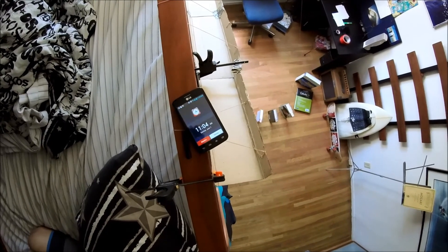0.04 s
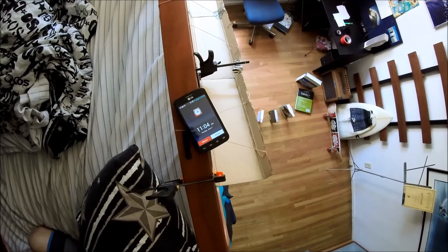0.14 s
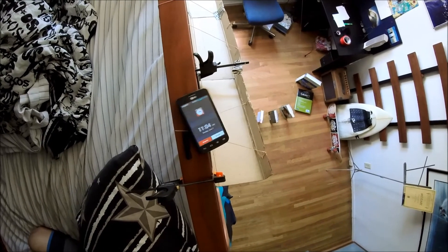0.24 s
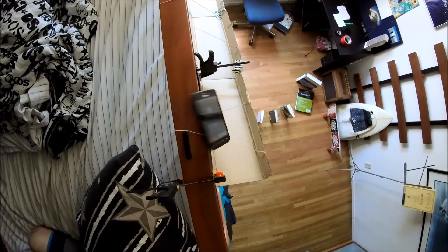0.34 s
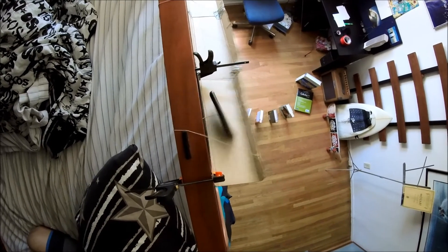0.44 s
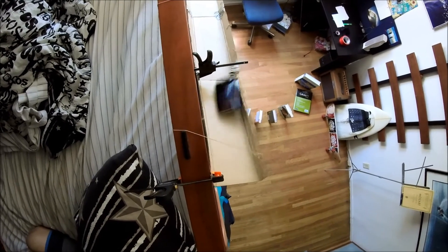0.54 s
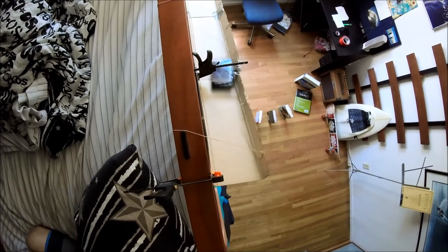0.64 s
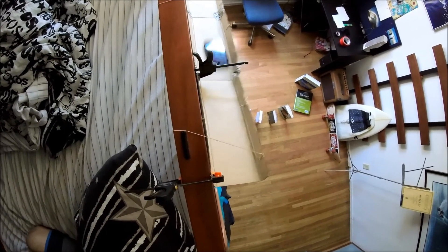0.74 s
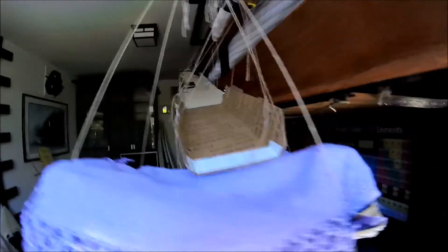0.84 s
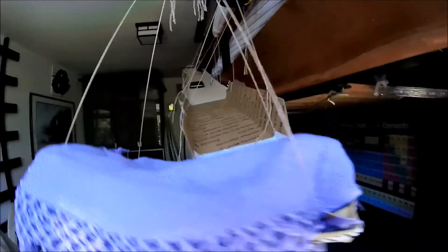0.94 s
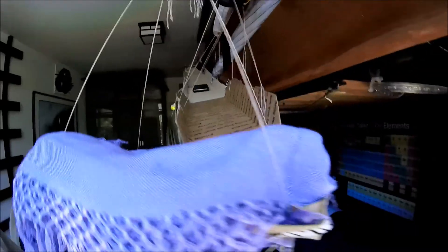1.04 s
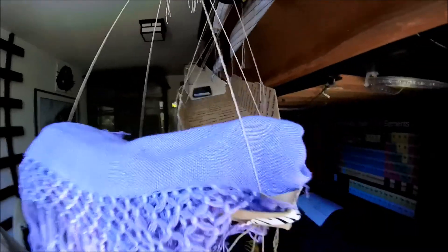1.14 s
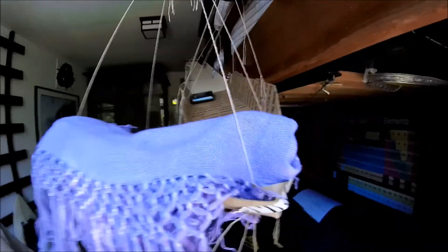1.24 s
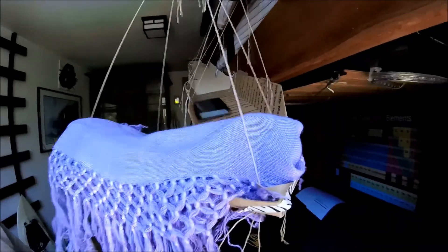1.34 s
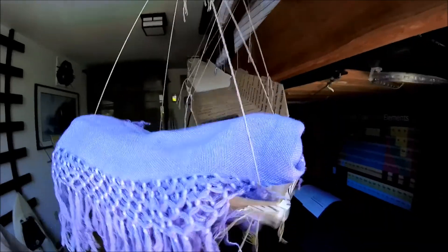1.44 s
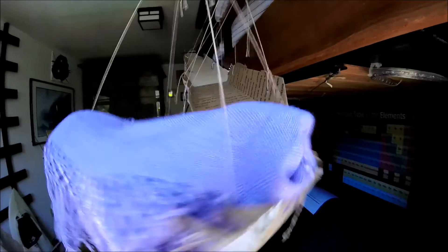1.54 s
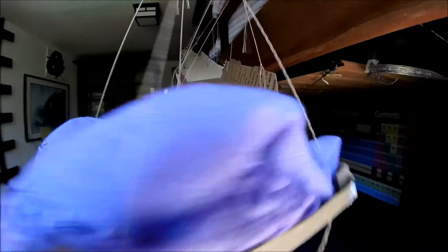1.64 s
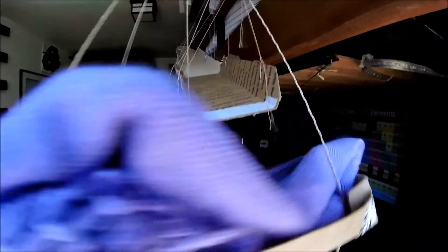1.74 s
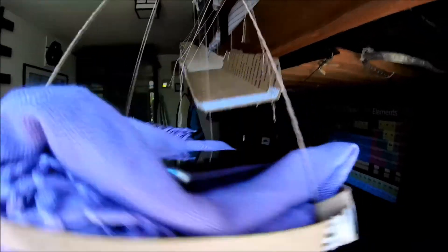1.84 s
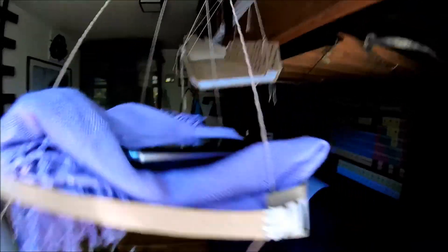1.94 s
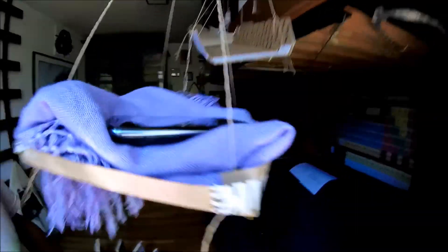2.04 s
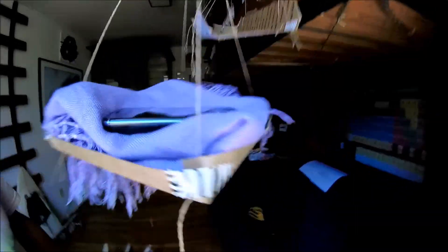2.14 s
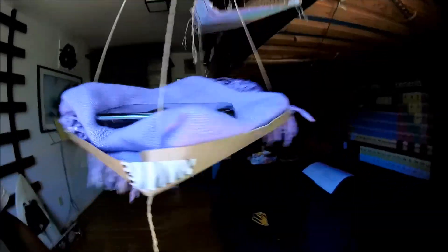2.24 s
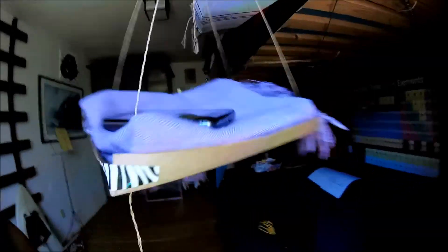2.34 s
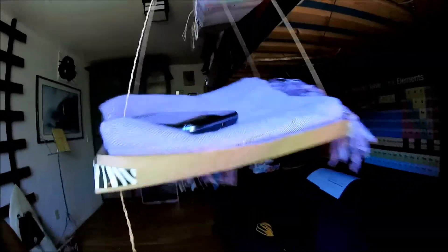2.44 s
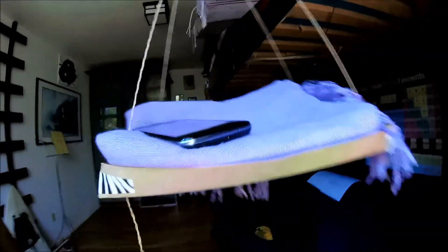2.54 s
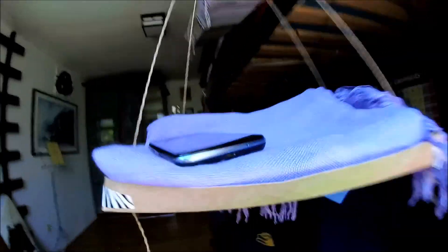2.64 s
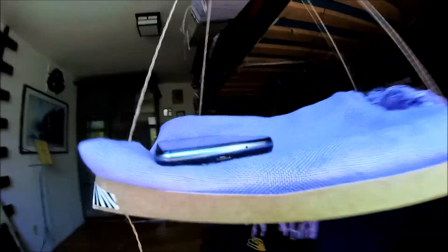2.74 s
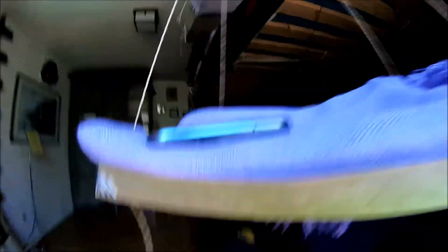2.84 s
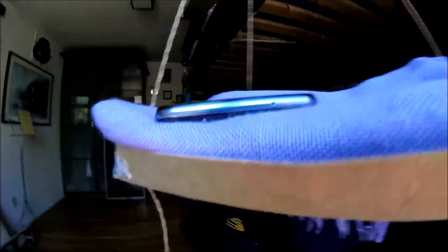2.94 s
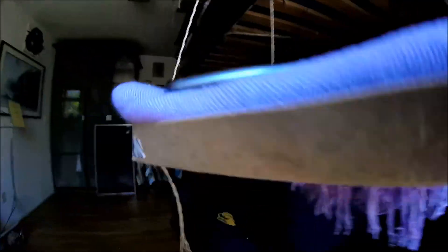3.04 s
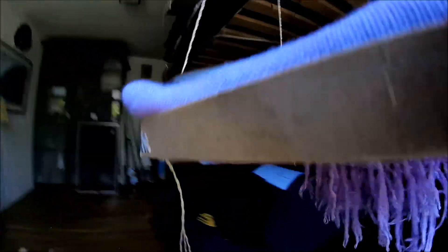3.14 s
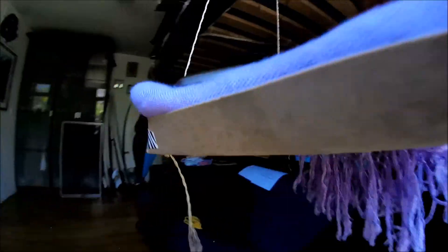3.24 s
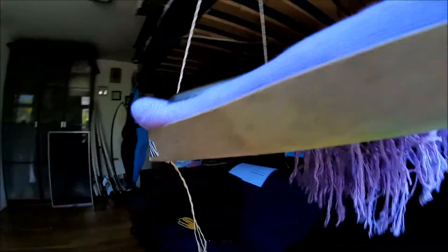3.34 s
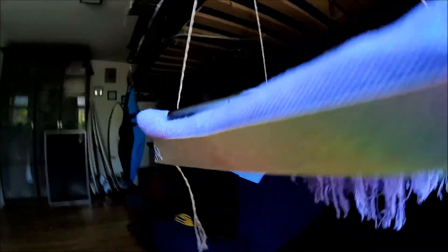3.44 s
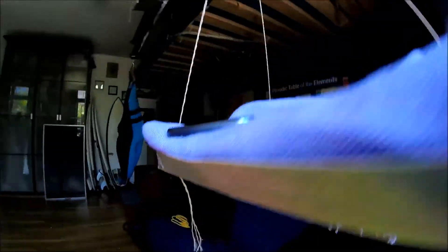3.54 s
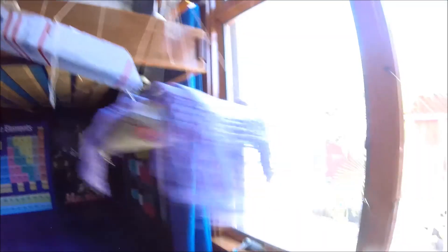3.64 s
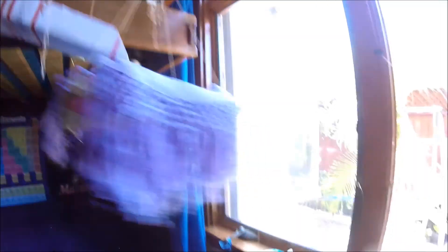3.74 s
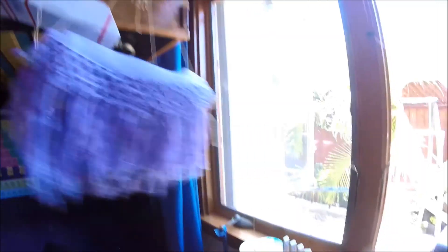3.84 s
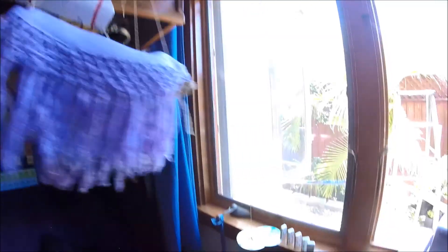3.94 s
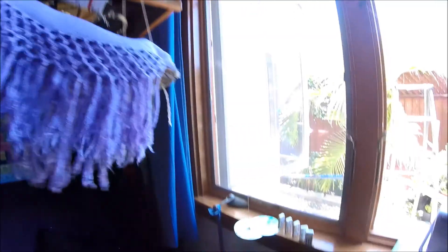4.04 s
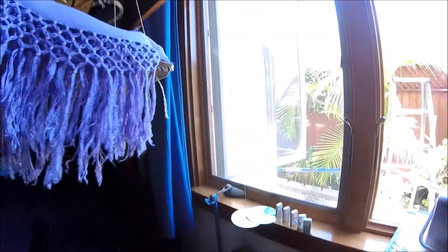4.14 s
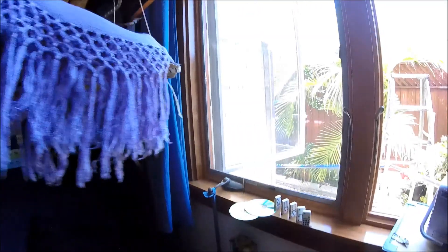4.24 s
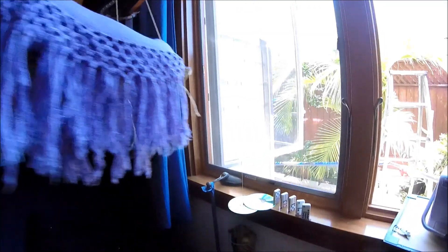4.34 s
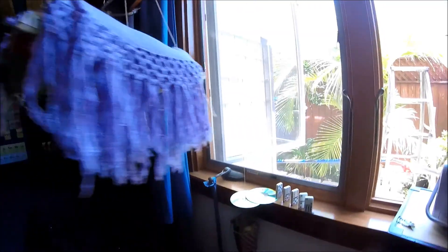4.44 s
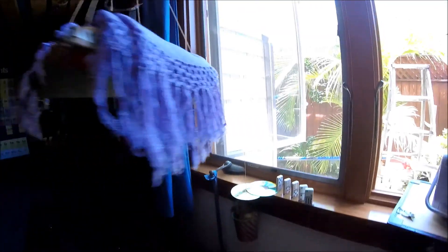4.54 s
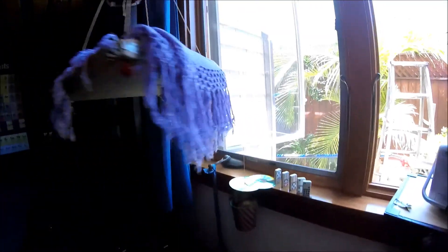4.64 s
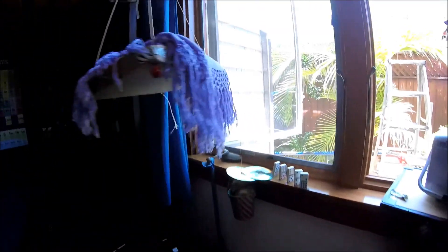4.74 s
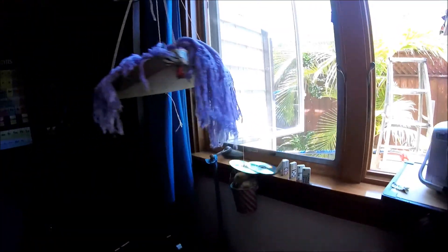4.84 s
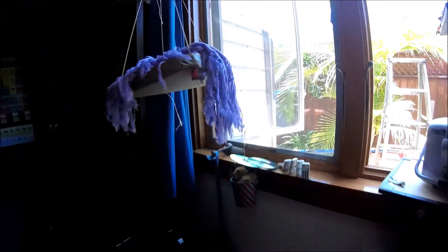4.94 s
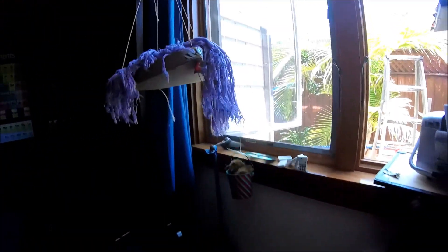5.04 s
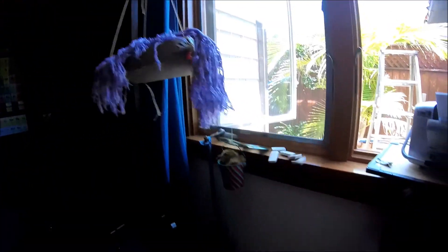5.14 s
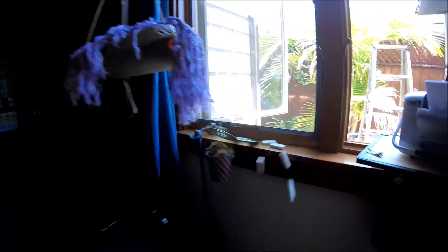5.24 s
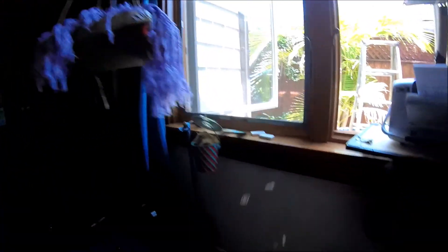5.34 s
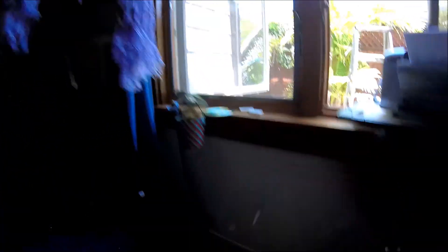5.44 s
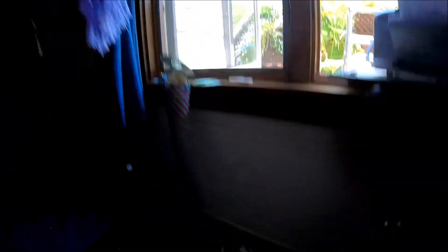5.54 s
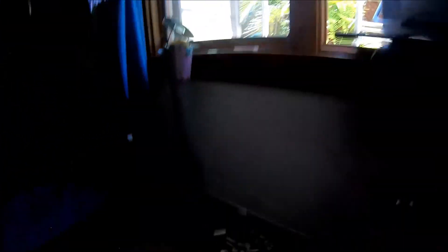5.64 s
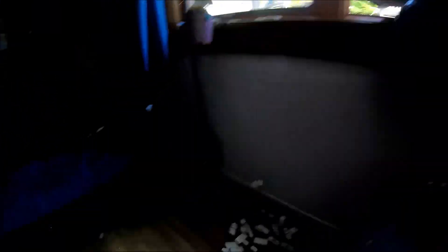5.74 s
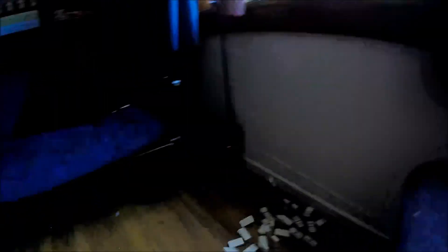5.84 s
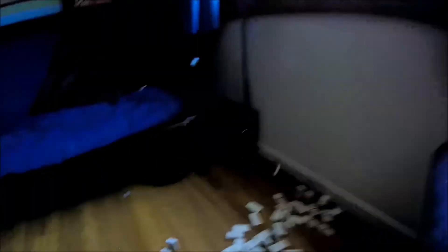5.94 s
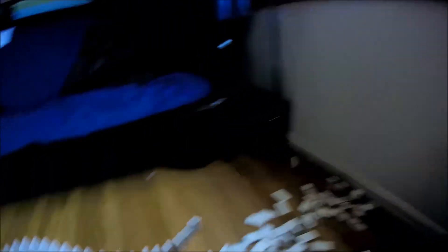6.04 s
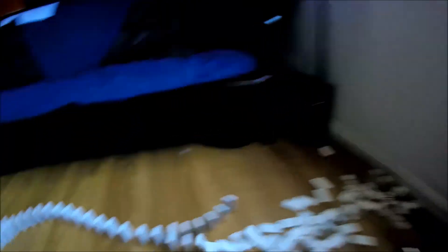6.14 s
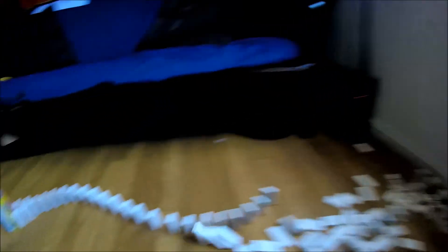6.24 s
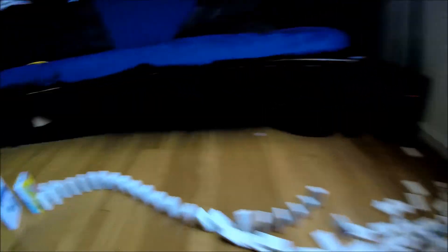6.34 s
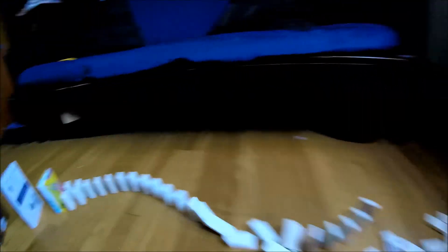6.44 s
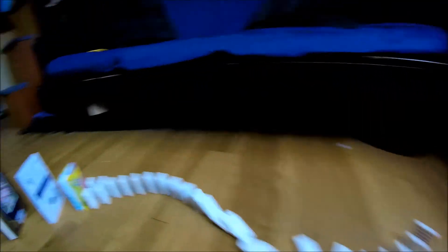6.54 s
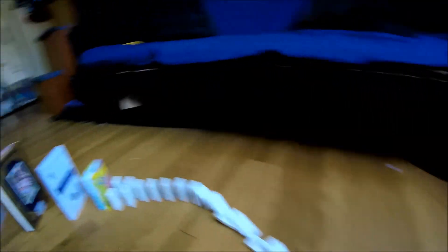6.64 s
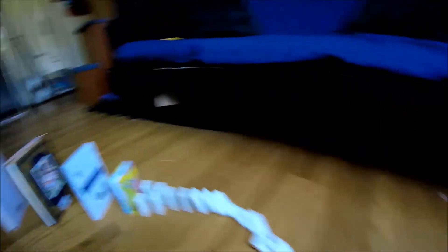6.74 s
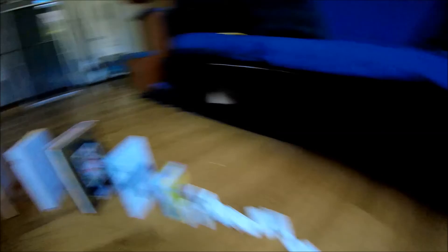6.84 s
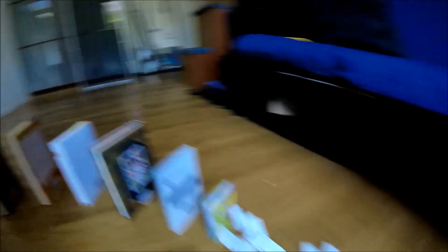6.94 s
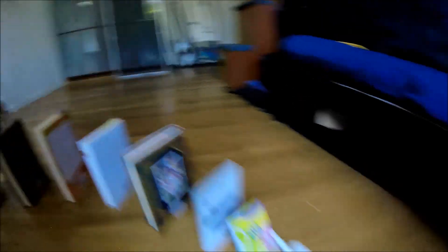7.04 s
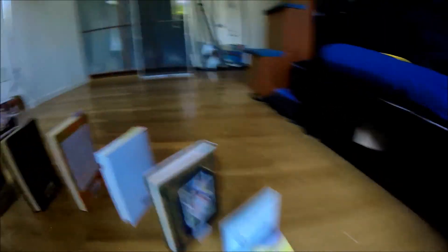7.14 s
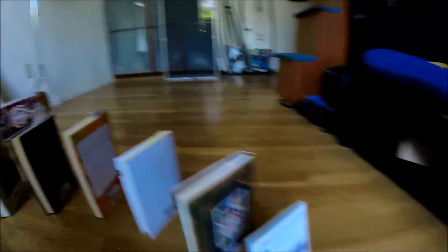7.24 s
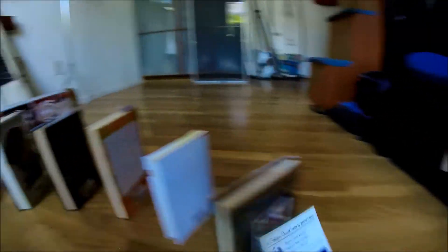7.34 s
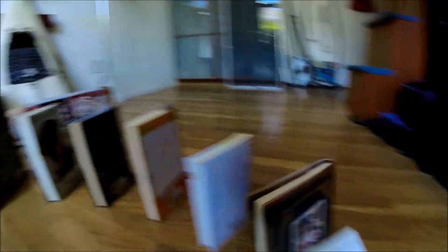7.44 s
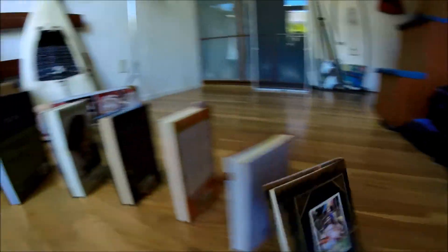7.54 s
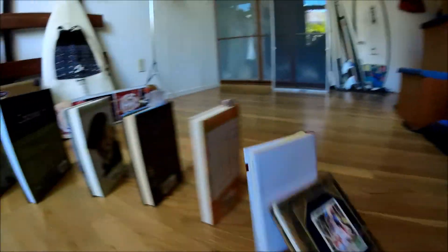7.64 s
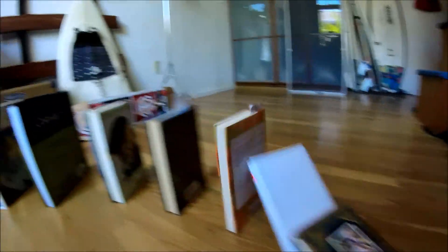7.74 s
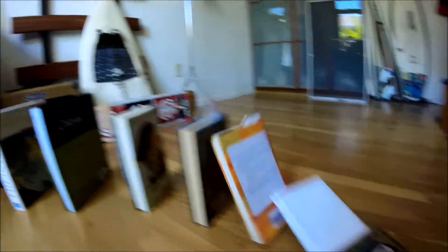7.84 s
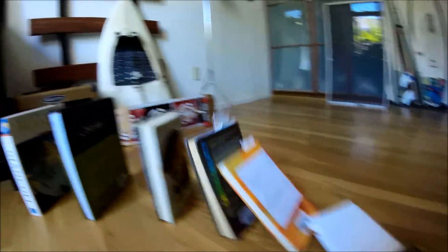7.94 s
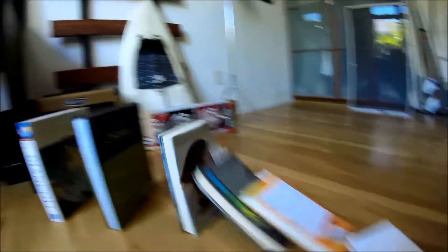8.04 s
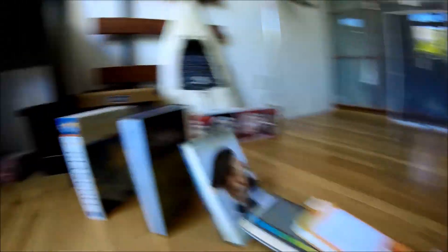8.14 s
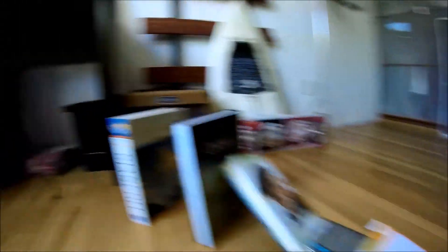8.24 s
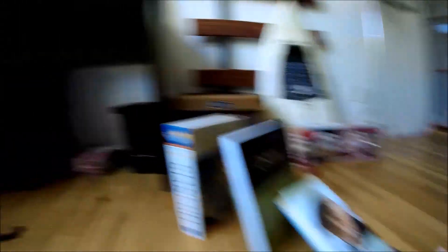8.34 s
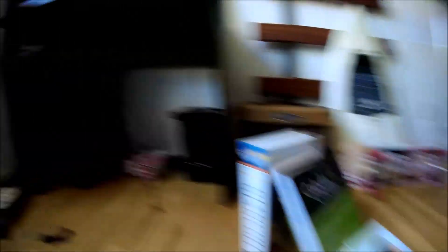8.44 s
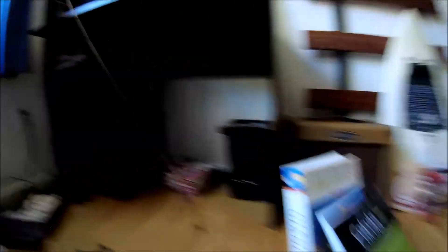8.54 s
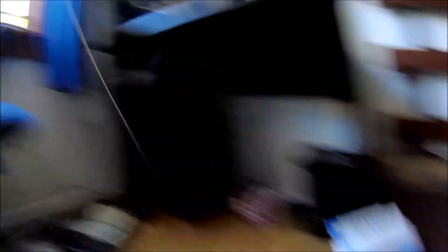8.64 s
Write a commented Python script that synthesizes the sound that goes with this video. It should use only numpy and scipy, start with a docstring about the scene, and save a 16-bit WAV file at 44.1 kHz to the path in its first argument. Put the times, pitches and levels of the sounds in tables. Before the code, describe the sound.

Short vibration hum, hollow cardboard knocks, a rustling cloth swing with sharp clicks, a bright spill of clacking dominoes, then padded book thuds indoors.

```python
"""A phone buzzes, tips off a beam and tumbles down a cardboard chute into a cloth swing that creaks and clicks.
Dominoes then drop from a window sill, spill over a wooden floor and topple in a row; the last fells some books.
The microphone travels along through the bedroom, so rumble and a short echo lie under it all.
Blows are short noisy pushes into resonances or filters, rubbing is a stream of random clicks,
and the motor and the ringing tiles are sums of sine waves."""
import sys
import numpy as np
from scipy import signal
from scipy.fft import rfft, irfft
from scipy.io import wavfile
from scipy.ndimage import uniform_filter1d

SR = 44100
rng = np.random.default_rng(int(sys.argv[2]) if len(sys.argv) > 2 else 0)


def unload_audio(sound):
    """Save the sound as a 16-bit wav file, at the path given as the first command line argument."""
    columns = np.transpose(np.atleast_2d(sound))
    # keep every value between -1 and 1, then stretch to whole-number steps
    steps = np.round(np.clip(columns, -1, 1) * 32767)
    wavfile.write(sys.argv[1], SR, steps.astype(np.int16))


N = 383669
TIME = np.arange(N) / SR
AGE = np.arange(SR // 5) / SR   # seconds since a blow
ATTACK = SR // 100   # samples in 10 ms


def from_db(db):
    """Turn decibels into an amplitude gain."""
    return 10 ** (np.asarray(db) / 20)


def rms_one(x):
    """Scale a sound to an average power of one."""
    return x / np.sqrt(np.mean(x ** 2) + 1e-20)


def even(x, span_s):
    """Level out slow changes in loudness but keep the quick grain."""
    power = uniform_filter1d(x ** 2, max(int(span_s * SR), 1))
    floor = np.mean(x ** 2) / 100
    return x / np.sqrt(np.maximum(power, 0) + floor)


def gains(rows):
    """Draw each dB column as a gain over time, silent outside the table's span."""
    times, *columns = np.transpose(rows)
    return [from_db(np.interp(TIME, times, column, left=-200, right=-200)) for column in columns]


def held(start, end, attack_s, release_db_per_s):
    """An envelope that rises in a straight line, holds until its end, then dies away."""
    rise = np.clip((TIME - start) / attack_s, 0, 1)
    drop_db = np.minimum(release_db_per_s * np.maximum(TIME - end, 0), 200)
    return rise * from_db(-drop_db)


def swell(s, rise, fall):
    """A bell-shaped envelope that peaks at s; rise and fall are its half lengths in seconds."""
    distance = (TIME - s) / np.where(TIME < s, rise, fall)
    return np.exp(-np.minimum(distance ** 2, 40))


def add(track, s, db, sound):
    """Lay a hit into a track; its level is the rms of its first 10 ms."""
    at = max(round(s * SR), 0)
    part = sound[:N - at] / np.sqrt(np.mean(sound[:ATTACK] ** 2) + 1e-20)
    track[at:at + len(part)] += from_db(db) * part


def colour(x, spectrum, stretch=1):
    """Filter with a drawn spectrum, its frequencies stretched, without any sound ahead of the blow."""
    size = 4096
    hz, db = np.transpose(spectrum)
    grid = np.log(np.maximum(np.arange(size // 2 + 1) * SR / size, 1) / stretch)
    # beyond the drawn points the response falls by up to 40 dB
    beyond = np.maximum(np.log(hz[0]) - grid, 0) + np.maximum(grid - np.log(hz[-1]), 0)
    level_db = np.interp(grid, np.log(hz), db) - 40 * np.minimum(beyond, 1)
    # folding the cepstrum makes the filter minimum-phase
    cepstrum = irfft(np.log(from_db(level_db)))
    cepstrum[1:size // 2] *= 2
    cepstrum[size // 2 + 1:] = 0
    response = irfft(np.exp(rfft(cepstrum)))
    return signal.oaconvolve(x, response)[:len(x)]


def resonate(x, modes, detune=0., scatter_db=0.):
    """Ring side-by-side resonances; each call finds them a little different in pitch and strength."""
    out = 0
    for k, (hz, width, db) in enumerate(modes):
        r = np.exp(-np.pi * width / SR)
        w = 2 * np.pi * hz * np.exp(detune * rng.normal()) / SR
        gain = (-1) ** k * from_db(db + scatter_db * rng.normal()) * (1 - r * r) / 2
        out = out + gain * signal.lfilter([1, 0, -1], [1, -2 * r * np.cos(w), r * r], x)
    return out


def contact(t60, diffuse):
    """A sharp push, then chatter that builds and dies, `diffuse` times as strong."""
    chatter = rng.standard_normal(len(AGE)) * from_db(-60 * AGE / t60)
    chatter = chatter * (1 - np.exp(-AGE / 0.00099))
    return (AGE == 0) + diffuse * chatter / np.linalg.norm(chatter)


def grains(per_s, spread_db):
    """Random clicks of uneven size."""
    sizes = from_db(spread_db * np.minimum(rng.exponential(1, N), 3.5))
    return (rng.random(N) < per_s / SR) * sizes * rng.choice([-1, 1], N)


def friction(spectrum, per_s, spread_db):
    """Rubbing: a stream of tiny slips into a surface."""
    return rms_one(colour(grains(per_s, spread_db), spectrum))


# tone of the room's steady air noise: (f/Hz, level/dB)
AIR_SPECTRUM = [(59, -35), (100, -6), (206, 1.5), (277, -5), (608, -8.5), (768, -14), (1100, -17.5),
                (1910, -13), (2470, -24), (3320, -22), (8640, -35.5), (14100, -41), (16000, -71)]


def room_air():
    """The quiet room hisses softly: steady random noise, shaped in tone."""
    return from_db(-53) * rms_one(colour(rng.standard_normal(N), AIR_SPECTRUM))


# tone of the low rumble: (f/Hz, level/dB)
RUMBLE_SPECTRUM = [(15, -11), (35, -2.5), (52, -4), (85, -6), (130, -10), (220, -27.5), (500, -57)]
# jolts of the travelling microphone: (t/s, rumble level/dB, half length/s)
MICROPHONE_JOLTS = [(1.0, -49, 0.14), (1.5, -47, 0.13), (2.1, -53.5, 0.69), (2.723, -45, .05),
                    (2.928, -50, 0.16), (3.286, -48, 0.057), (3.466, -44.5, 0.098), (7.4, -48.5, 0.21)]
STEADY_RUMBLE_DB = -58
# rumble set off by the blows, relative to their own level, and the decay time of its power
CHUTE_SHAKE_DB, BOOK_SHAKE_DB, SHAKE_DECAY_S = -18.5, -10, 0.055


def rumble(chute, row):
    """Rig and floor rumble: always a little, more after heavy blows and when the microphone is jolted."""
    keep = np.exp(-1 / (SHAKE_DECAY_S * SR))
    blows = from_db(CHUTE_SHAKE_DB) * chute + from_db(BOOK_SHAKE_DB) * row
    shaking = signal.lfilter([1 - keep], [1, -keep], blows ** 2 + 1e-18)
    power = from_db(STEADY_RUMBLE_DB) ** 2 + shaking
    for s, db, width in MICROPHONE_JOLTS:
        power += (from_db(db) * swell(s, width, width)) ** 2
    noise = colour(rng.standard_normal(N), RUMBLE_SPECTRUM)
    return np.sqrt(power) * even(noise, span_s=0.2)


# how long the bedroom echo takes to drop by 60 dB: (f/Hz, decay time/s)
ECHO_DECAY = [(100, 0.36), (500, 0.42), (1500, 0.26), (4000, 0.45), (9000, 0.36), (15000, 0.088)]


def room_echo():
    """Diffuse echo of unit energy: noise that dies at its own pace in each octave."""
    hz, t60 = np.transpose(ECHO_DECAY)
    age = np.arange(SR * 3 // 4) / SR
    out = 0
    for low in 60 * 2. ** np.arange(8):
        octave = signal.butter(2, [low, 2 * low], "band", fs=SR, output="sos")
        band = signal.sosfilt(octave, rng.standard_normal(len(age)))
        decay_s = np.interp(low * np.sqrt(2), hz, t60)
        out = out + band * from_db(-60 * age / decay_s)
    out = out * (1 - np.exp(-(age / 0.004) ** 2))   # the echo takes a moment to build
    return out / np.linalg.norm(out)


# the swing's cloth rustles as it sways: (t/s, level/dB before the trim below)
SWAY_RUSTLE = [(1.6, -57), (1.99, -56), (2.89, -53), (3.03, -43.5), (3.36, -61), (3.5, -64), (3.59, -59),
               (4.06, -59), (4.7, -73)]
RUSTLE_TRIM_DB = -2
# quick swishes of cloth and string: (t/s, level/dB, rise/s, fall/s, brightness with 1 = plain)
CLOTH_SWISHES = [(1.72, -51, 0.016, 0.05, .9), (1.845, -45, .007, 0.01, .75),
                 (2.675, -42.5, .021, 0.012, 1.7), (2.86, -45, 0.022, 0.025, 1.3),
                 (2.90, -35.5, 0.0088, 0.028, 1), (3.19, -42, 0.054, 0.065, 1.07),
                 (3.354, -42, .01, .028, 1.11), (3.445, -41.5, .006, .019, 0.93),
                 (3.531, -39.5, 0.026, 0.0065, 1.36), (3.905, -40.5, 0.013, .031, 0.61),
                 (4.3, -53, 0.13, 0.13, 0.81), (4.78, -45, .025, 0.13, 0.97),
                 (5.45, -48.5, .027, 0.052, .9)]
# tone of the rubbing fibres: (f/Hz, level/dB)
CLOTH_SPECTRUM = [(300, -5), (560, -3.5), (950, -5.5), (1500, -6), (2100, 3), (2650, -6), (3400, 0),
                  (4300, -6), (5500, -9), (7500, -12), (10000, -26), (15000, -30)]
# resonances of taut string and weave, which each swish excites differently: (f/Hz, width/Hz, level/dB)
WEAVE_MODES = [(1700, 210, 0), (3460, 130, 10.5), (4290, 140, 4), (7000, 490, -7.5)]


def cloth():
    """Fibres slip softly as the swing sways, and in swishes when it jerks."""
    rustle = gains(SWAY_RUSTLE)[0] * friction(CLOTH_SPECTRUM, per_s=3200, spread_db=3.5)
    out = from_db(RUSTLE_TRIM_DB) * rustle
    for s, db, rise, fall, bright in CLOTH_SWISHES:
        fibres = rms_one(colour(grains(per_s=3000, spread_db=3), CLOTH_SPECTRUM, stretch=bright))
        plucks = grains(per_s=2500, spread_db=3.5)
        weave = rms_one(resonate(plucks, WEAVE_MODES, detune=0.083, scatter_db=5))
        out += from_db(db) * swell(s, rise, fall) * rms_one(fibres + 0.54 * weave)
    return out


# resonances of the track under a rolling thing: (f/Hz, width/Hz, level/dB)
TRACK_MODES = [(499, 35, 9.5), (572, 23, 4)]
ROLL_START_S, ROLL_ATTACK_S, ROLL_RELEASE_DB_PER_S, ROLL_DB = 4.76, .05, 104, -40.5


def rolling():
    """Something small rolls before the dominoes fall: fine clicks make its track drone."""
    envelope = held(ROLL_START_S, ROLL_START_S + ROLL_ATTACK_S, ROLL_ATTACK_S, ROLL_RELEASE_DB_PER_S)
    drone = rms_one(resonate(grains(per_s=1400, spread_db=3.5), TRACK_MODES))
    return from_db(ROLL_DB) * envelope * drone


# hollow knocks of a light part: (t/s, peak level/dB, f/Hz, swell/s)
HOLLOW_KNOCKS = [(2.9493, -19.5, 544, 0.005), (3.35, -44.5, 585, 0.013)]


def hollow():
    """A cavity swells into one soft note and dies."""
    out = np.zeros(N)
    for s, db, hz, swell_s in HOLLOW_KNOCKS:
        age = np.maximum(TIME - s, 0)
        envelope = (age / swell_s * np.exp(1 - age / swell_s)) ** 2
        out += from_db(db) * envelope * np.sin(2 * np.pi * hz * age)
    return out


# small dry clicks close by: (t/s, level/dB before the final filter, centre f/Hz)
DRY_CLICKS = [(0.755, -35, 5500), (1.502, -38, 3640), (1.512, -40, 3760), (1.536, -34, 3200),
              (1.712, -42.5, 2930), (2.9185, -18.5, 3840), (2.9186, -18, 7640), (2.98, -42.5, 1180),
              (3.1562, -25.5, 5370), (3.162, -27.5, 1450), (3.2656, -36.5, 2170), (3.2901, -41, 2560),
              (3.397, -35.5, 1860), (3.4387, -42, 2620), (3.471, -30, 1800), (3.4758, -26, 2380),
              (3.577, -45, 3600), (7.5123, -45.5, 1155), (7.634, -36.5, 4100), (7.924, -38.5, 1700),
              (8.4948, -32, 3240)]


def ticks():
    """Hard little clicks: very short contacts ring three broad resonances set by each click's pitch."""
    out = np.zeros(N)
    for s, db, hz in DRY_CLICKS:
        body = [(0.89 * hz, 0.39 * hz, 0), (2.03 * hz, 0.31 * hz, -4), (2 * hz, 0.31 * hz, -5)]
        add(out, s, db, resonate(contact(t60=0.0094, diffuse=1.0), body, detune=.01))
    tone = [(100, 21), (1000, 0.5), (3000, -2), (4300, -3),
            (8000, -4), (10500, -12.5), (12500, -9), (15500, -17)]
    return colour(out, tone)


# tone of a hard crack of the phone's case: (f/Hz, level/dB)
CRACK_SPECTRUM = [(700, -34), (1200, -1.5), (1600, 6), (2050, 6.5), (2600, -20.5), (3500, -8.5),
                  (5000, -22.5), (8000, -22), (14000, -55)]
MOTOR_HZ = 221   # turns per second
# the parts of the hum: (multiple of the motor speed, level/dB within the hum)
HUM_PARTS = [(1, -6.5), (2, -13), (3, -18)]
# the vibration motor runs: (start t/s, end t/s, hum level/dB)
MOTOR_RUNS = [(0, .26, -52.5), (.43, .48, -50.5)]
MOTOR_SPIN_UP_S, MOTOR_RUN_DOWN_DB_PER_S = 0.027, 260
RATTLE_S, RATTLE_WIDTH_S, RATTLE_DB = .2, .05, -57.5   # the case chatters on the beam for a moment


def motor():
    """The off-centre weight hums; once a turn the case taps the beam."""
    hum = 0
    for start, end, db in MOTOR_RUNS:
        hum = hum + from_db(db) * held(start, end, MOTOR_SPIN_UP_S, MOTOR_RUN_DOWN_DB_PER_S)
    turns = MOTOR_HZ * TIME
    tone = sum(from_db(db) * np.sin(2 * np.pi * multiple * turns) for multiple, db in HUM_PARTS)
    taps = np.diff(np.floor(turns), prepend=0) * (1 + 0.15 * rng.standard_normal(N))
    rattle = from_db(RATTLE_DB) * swell(RATTLE_S, RATTLE_WIDTH_S, RATTLE_WIDTH_S)
    return hum * rms_one(tone) + rattle * rms_one(colour(taps, CRACK_SPECTRUM))


# the phone bounces in the cardboard chute: (t/s, boom level/dB, knock level/dB, crack level/dB)
PHONE_BOUNCES = [(0.489, -19, -12.5, -22), (0.5269, -14.5, -13.5, -27), (0.5549, -45, -30, -31),
                 (0.5715, -16, -19, -31.5), (0.6457, -16, -18, -41), (0.6921, -24.5, -24.5, -34.5),
                 (0.721, -23, -23.5, -22.5), (0.7544, -34.5, -31, -33), (0.886, -33, -40, -46),
                 (0.972, -35, -44, -54), (1.2007, -39, -40, -40), (1.347, -39, -48, -40.5),
                 (1.393, -34.5, -32, -57), (1.4454, -41, -36.5, -54), (1.5009, -37, -35, -27.5),
                 (1.512, -45, -45, -32.5), (1.5401, -38, -44, -34), (1.877, -41.5, -51, -44.5)]
# the phone slides between bounces: (start t/s, end t/s, drumming level/dB, scrape level/dB)
PHONE_SLIDES = [(0.494, 0.772, -35.5, -49), (.82, 1.043, -45.5, -50.5), (1.196, 1.528, -37.5, -47.5)]
# deep resonances of the chute: (f/Hz, width/Hz, level/dB)
BOOM_MODES = [(55, 35, -11), (150, 14.6, -7), (238.6, 21.5, 1.5), (336, 39, -6)]
# higher resonances of the chute: (f/Hz, width/Hz, level/dB)
KNOCK_MODES = [(440, 87, -3.5), (554, 71, 0), (735, 46, -11.5), (977, 85, -19.5)]
# tone of the chute drumming under the slide: (f/Hz, level/dB)
DRUMMING_SPECTRUM = [(65, -55), (110, -10.5), (224, 0), (332, -22), (380, -3), (467, -6.5), (540, -14),
                     (699, -7), (860, -14.5), (1300, -21.5), (1690, -31), (2860, -120)]
# tone of the scrape on its surface: (f/Hz, level/dB)
SCRAPE_SPECTRUM = [(590, -37), (1000, -17), (1340, 5), (1540, -7), (1910, 3.5), (2710, -10), (4410, -11),
                   (5660, -15), (8230, -18), (15000, -40)]
CRACK_SCATTER = 0.082   # the pitch of the crack differs by about this share from bounce to bounce
SLIDE_ATTACK_S, SLIDE_RELEASE_DB_PER_S = .01, 260


def phone():
    """The phone bounces in the chute, which booms and knocks, and slides between bounces."""
    out = np.zeros(N)
    for s, boom_db, knock_db, crack_db in PHONE_BOUNCES:
        push = contact(t60=0.076, diffuse=0.44)
        add(out, s, boom_db, resonate(push, BOOM_MODES, detune=0.038, scatter_db=3.5))
        add(out, s, knock_db, resonate(push, KNOCK_MODES, detune=0.04))
        stretch = np.exp(CRACK_SCATTER * rng.normal())
        add(out, s, crack_db, colour(contact(t60=0.03, diffuse=0.54), CRACK_SPECTRUM, stretch))
    drumming = friction(DRUMMING_SPECTRUM, per_s=540, spread_db=1.5)
    scrape = friction(SCRAPE_SPECTRUM, per_s=1000, spread_db=3.0)
    for start, end, drumming_db, scrape_db in PHONE_SLIDES:
        slide = from_db(drumming_db) * drumming + from_db(scrape_db) * scrape
        out += held(start, end, SLIDE_ATTACK_S, SLIDE_RELEASE_DB_PER_S) * slide
    return out


# books falling on each other: (t/s, thud level/dB, f/Hz, cover slap level/dB)
BOOK_FALLS = [(7.648, -24.5, 400, -39), (7.6933, -24, 407, -29.5), (7.7156, -32, 375, -28),
              (7.7888, -28, 440, -32), (7.842, -33, 360, -43), (7.8696, -23.5, 370, -37.5),
              (7.924, -23.5, 306, -33.5), (7.986, -26.5, 310, -34), (8.0088, -33, 610, -36),
              (8.074, -27.5, 150, -36), (8.133, -25.5, 286, -41), (8.171, -29, 290, -58),
              (8.211, -31, 293, -46), (8.2507, -16, 247, -33.5), (8.2812, -20, 290, -34.5),
              (8.372, -24.5, 227, -31), (8.4949, -25.5, 211, -30), (8.5142, -27, 218, -29.5),
              (8.5482, -29, 226, -43), (8.64, -37, 470, -33.5)]
# tone of the slapping covers: (f/Hz, level/dB)
SLAP_SPECTRUM = [(350, -11.5), (650, 7.5), (950, -3), (1400, 2.5), (2050, 7), (2700, -11), (3700, -10),
                 (5500, -18.5), (8500, -17), (14000, -63)]
# between blows the books lean and slide: (t/s, body level/dB, cover rub level/dB), before the trims below
BOOK_LEAN = [(7.55, -49, -53.5), (7.7, -50, -47), (7.836, -37, -52), (8.166, -35, -45), (8.326, -40, -46),
             (8.432, -45.5, -59), (8.582, -33, -44.5), (8.7, -35.5, -44.5)]
LEAN_BODY_TRIM_DB, LEAN_RUB_TRIM_DB = -4, -0.5
# tone of the books' bodies as they lean: (f/Hz, level/dB)
BODY_SPECTRUM = [(59, -49), (100, 3.5), (145, -1), (220, -3.5), (292, -8.5), (586, -6.5), (888, -37),
                 (1200, -33), (1560, -54), (2640, -120)]
# tone of cover rubbing on cover: (f/Hz, level/dB)
RUB_SPECTRUM = [(600, -2), (1000, -2), (2000, 3), (2700, -5.5), (3700, -5), (5500, -10), (8500, -11),
                (11000, -18), (15000, -24)]


def books():
    """Each book meets the next with a padded thud and a slap of covers, then slides on it."""
    out = np.zeros(N)
    for s, thud_db, hz, slap_db in BOOK_FALLS:
        modes = [(0.59 * hz, 55, -14), (hz, 60, 0), (1.55 * hz, 120, -9)]
        thud = resonate(contact(t60=0.053, diffuse=0.83), modes, detune=0.014, scatter_db=2.5)
        add(out, s, thud_db, colour(thud, [(40, -1.5), (600, 0.0), (1200, -14), (4000, -33)]))
        add(out, s, slap_db, colour(contact(t60=0.035, diffuse=2.5), SLAP_SPECTRUM))
    body, rub = gains(BOOK_LEAN)
    out += from_db(LEAN_BODY_TRIM_DB) * body * friction(BODY_SPECTRUM, per_s=370, spread_db=3.0)
    out += from_db(LEAN_RUB_TRIM_DB) * rub * friction(RUB_SPECTRUM, per_s=2300, spread_db=3)
    return out


# domino modes: (multiple of its pitch, level/dB, time to drop by 60 dB/s)
TILE_MODES = [(.79, -13, 0.027), (0.998, 6, 0.037), (1.025, -9, .022), (1.124, -5.5, 0.027)]
TILE_HZ, TILE_SCATTER_HZ = 8440, 99   # a domino's ring, and how much the tiles differ


def tile_ring():
    """One domino rings briefly, at a pitch of its own, with a hard snap at the start."""
    hz = TILE_HZ + TILE_SCATTER_HZ * rng.normal()
    ring = 0
    for ratio, db, t60 in TILE_MODES:
        decay = from_db(db - 60 * AGE / t60 + 4.9 * rng.normal())
        mode_hz = hz * ratio * (1 + 0.0064 * rng.normal())
        ring = ring + decay * np.sin(2 * np.pi * mode_hz * AGE)
    snap_tone = [(4000, -51), (7000, 20.5), (10000, 19.0), (11500, 7), (15000, -5.5)]
    return ring + 1.13 * colour(contact(t60=0.006, diffuse=0.88), snap_tone)


# many dominoes at once - off the sill, first landing, scattering over the floor, along the row:
# (start t/s, end t/s, attack/s, release/dB per s, clatter level/dB, ringing level/dB), before the final filters
DOMINO_SPILLS = [(5.025, 5.269, 0.021, 382, -29.5, -39), (5.555, 5.66, 0.016, 218, -33, -39),
                 (5.684, 6.102, .14, 70, -26, -33), (6.177, 7.22, 0.093, 95, -28.5, -32.5)]


def tumble(sound, spread_db, count):
    """Contacts of uneven strength at random moments of the spills, no two alike."""
    out = np.zeros(N)
    first, last = DOMINO_SPILLS[0][0], DOMINO_SPILLS[-1][1] + 0.18
    for when, size in rng.random((count, 2)):
        add(out, first + when * (last - first), spread_db * size ** 2, sound())
    return out


# the loudest falls of single dominoes, before the final filters:
# (t/s, wood body level/dB, edge level/dB, ring level/dB)
DOMINO_FALLS = [(4.9232, -37.5, -40.5, -34), (4.9989, -31.5, -33, -27.5), (5.0277, -24, -22.5, -35),
                (5.0996, -15, -26, -27.5), (5.1048, -19, -15.5, -32), (5.1756, -19.5, -23.5, -46),
                (5.2271, -24.5, -24.5, -39), (5.5037, -30, -33.5, -40), (5.549, -11.5, -15, -28),
                (5.6115, -18.5, -27, -19.5), (5.6166, -21, -16.5, -18.5), (5.638, -17, -25, -24.5),
                (5.7488, -25.5, -24.5, -40), (5.8492, -21.5, -25, -29), (5.8893, -25.5, -20.5, -27),
                (5.9267, -20.5, -45, -43), (5.9733, -25, -26, -28.5), (6.0905, -20, -30, -32),
                (6.127, -29, -25.5, -25), (6.1725, -23, -21, -38), (6.348, -34, -38, -19),
                (6.3713, -21, -29, -25.5), (6.4733, -23.5, -26.5, -26), (6.5181, -26, -24, -25),
                (6.5324, -22.5, -20, -25), (6.579, -23.5, -25, -20.5), (6.6376, -23.5, -25, -28),
                (6.732, -23, -28, -23), (6.768, -22.5, -33, -24.5), (6.834, -25, -31, -19),
                (6.8742, -35, -49, -16.5), (6.8789, -28, -22.5, -27), (6.933, -26.5, -36, -25),
                (6.9944, -32, -44, -20), (7.0658, -23, -24.5, -44), (7.1135, -28, -21.5, -27),
                (7.13, -19, -18.5, -32), (7.216, -25, -25.5, -32), (7.306, -20.5, -23.5, -34),
                (7.3504, -23.5, -55, -46)]
# lower resonances of the struck wood: (f/Hz, width/Hz, level/dB)
WOOD_BODY_MODES = [(237, 133, -6), (394, 132, -6), (570, 190, -6), (1344, 254, -9), (1938, 304, 1.5),
                   (2225, 310, -3)]
# higher, sharper-sounding resonances of the wood: (f/Hz, width/Hz, level/dB)
WOOD_EDGE_MODES = [(2835, 380, 2.5), (3470, 920, 1), (4240, 460, 0.5), (5810, 1010, -5), (6750, 750, -6)]
# tone of the many clacks on wood: (f/Hz, level/dB)
CLATTER_SPECTRUM = [(41, -34), (70, -6), (94, -10.5), (150, -3), (442, -6.5), (488, -10), (528, -11.5),
                    (594, -2.5), (896, -14.5), (1890, 2.5), (2480, -8), (3330, -5), (4940, -14),
                    (6630, -15.5), (7600, -20.5), (9880, -22), (16700, -120)]
# a small tile's hard contact has little bass, and its finite length dulls the very top: (f/Hz, level/dB)
TOUCH_SPECTRUM = [(170, -23), (360, 0.5), (600, -1), (900, 1), (1500, 0), (9600, -0.5), (11000, 0.5),
                  (13000, -3), (15500, -16)]
# resonances of the floor: (f/Hz, width/Hz, level/dB)
FLOOR_MODES = [(90, 34, 1.7), (150, 78, 0), (259, 39, 0.79)]
# the microphone comes down to the floor, and the boards drum louder: (t/s, gain level/dB)
FLOOR_GAIN = [(5.54, -12), (5.85, -7), (6.35, 1.5), (7.55, 1)]
CLACK_T60 = 0.037   # a domino's contact chatters this long, in seconds
RING_FADE_S, RING_FADE_DB_PER_S = 7.0, 130   # the spilling tiles stop ringing as the row nears the books


def dominoes():
    """Tiles clack on the wood and clink together; behind the loudest, many more tumble."""
    out = np.zeros(N)
    edge_tone = [(1500, -15), (2800, 2.0), (7000, 4.5), (11000, 9), (15000, -20)]
    for s, body_db, edge_db, ring_db in DOMINO_FALLS:
        body_push = contact(t60=CLACK_T60, diffuse=1.58)
        add(out, s, body_db, resonate(body_push, WOOD_BODY_MODES, detune=0.067, scatter_db=1.5))
        edge_push = contact(t60=CLACK_T60, diffuse=3.0)
        edge = resonate(edge_push, WOOD_EDGE_MODES, detune=0.077, scatter_db=1.5)
        add(out, s, edge_db, colour(edge, edge_tone))
        add(out, s, ring_db, tile_ring())
    clacks = tumble(lambda: contact(t60=0.011, diffuse=1.48), spread_db=13, count=1000)
    on_wood = even(colour(clacks, CLATTER_SPECTRUM), span_s=0.06)
    on_tiles = even(tumble(tile_ring, spread_db=4.5, count=220), span_s=0.057)
    on_tiles = on_tiles * from_db(-RING_FADE_DB_PER_S * np.maximum(TIME - RING_FADE_S, 0))
    for start, end, attack_s, release_db_per_s, clatter_db, ringing_db in DOMINO_SPILLS:
        spill = from_db(clatter_db) * on_wood + from_db(ringing_db) * on_tiles
        out += held(start, end, attack_s, release_db_per_s) * spill
    # once they are off the sill, the floor drums under them
    floor = gains(FLOOR_GAIN)[0] * resonate(out, FLOOR_MODES)
    return colour(out, TOUCH_SPECTRUM) + floor


def scene():
    """All stages in one room; the nearer a thing is, the less of it goes to the echo."""
    chute, clicks, tiles, row = phone(), ticks(), dominoes(), books()
    notes = rolling() + hollow()
    to_room = from_db(-9.5) * chute + from_db(-18.5) * clicks + from_db(-11.5) * notes
    to_room += from_db(-7) * tiles + from_db(-9) * row
    echo = signal.oaconvolve(to_room, room_echo())[:N]
    background = room_air() + rumble(chute, row) + echo
    stages = motor() + chute + cloth() + clicks + notes + tiles + row
    return (background + stages)[None]


def record(dry):
    """The highest peaks are clipped, then everything above 15.6 kHz is cut steeply."""
    low_pass = signal.ellip(10, .1, 80, 15600, fs=SR, output="sos")
    return signal.sosfilt(low_pass, np.clip(dry, -1, 1))


dry = scene()
out = record(dry)
unload_audio(out)
```